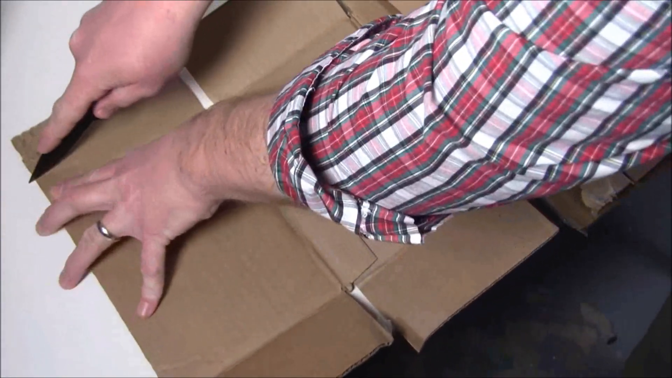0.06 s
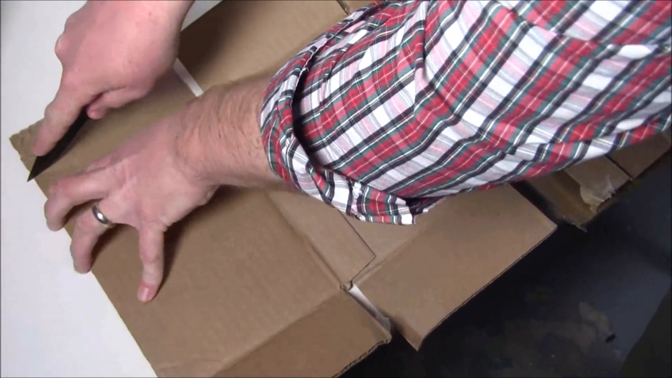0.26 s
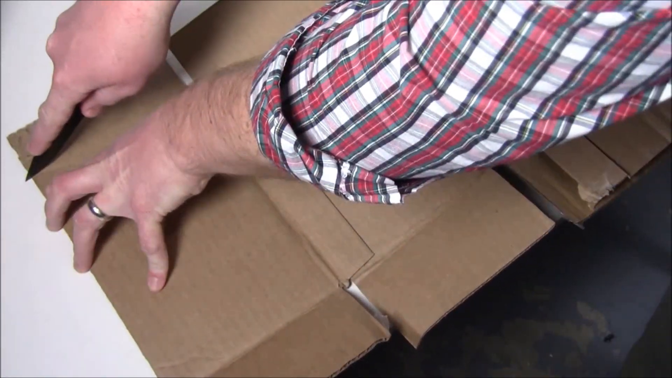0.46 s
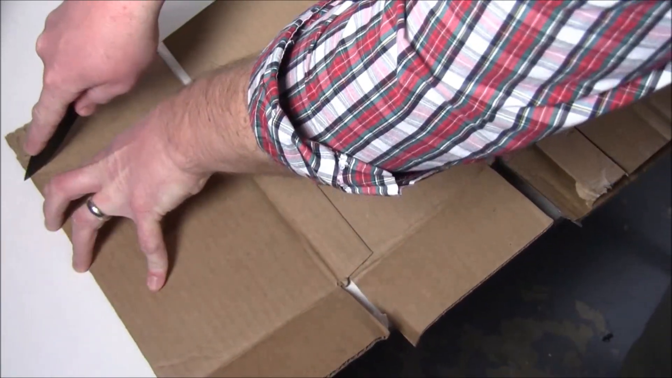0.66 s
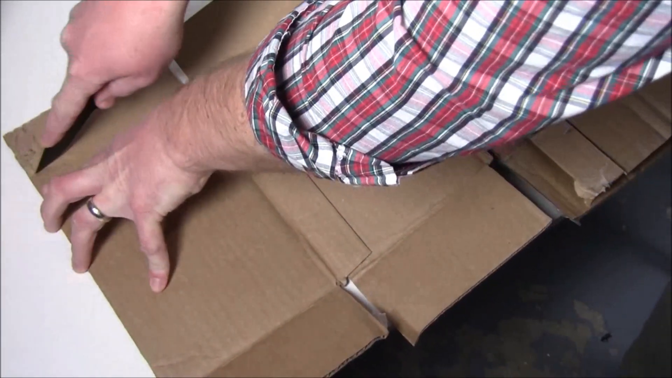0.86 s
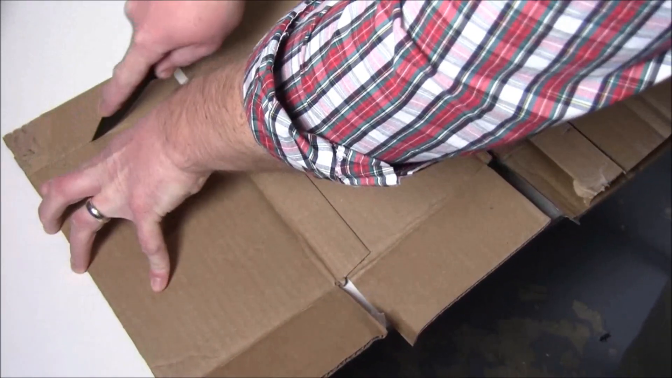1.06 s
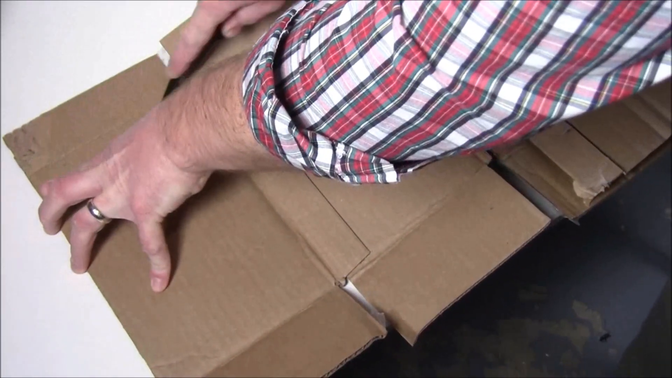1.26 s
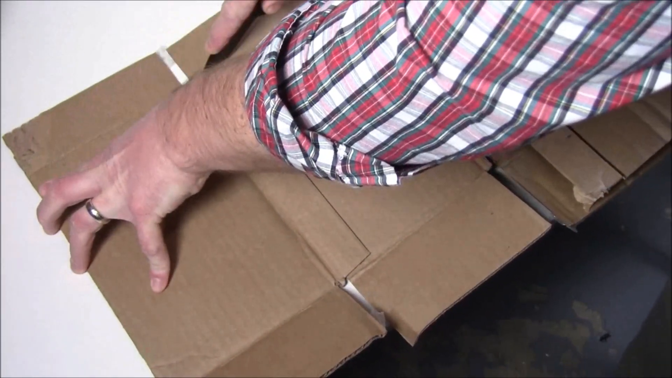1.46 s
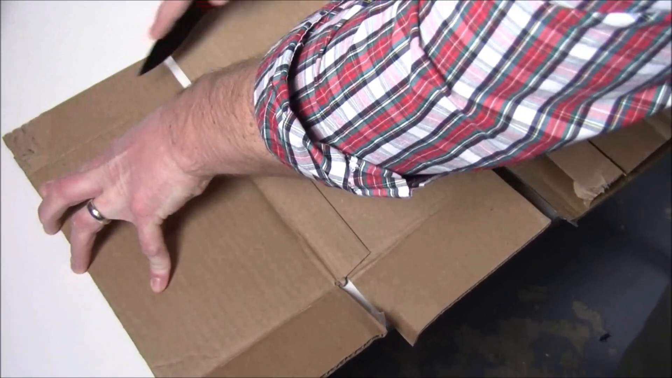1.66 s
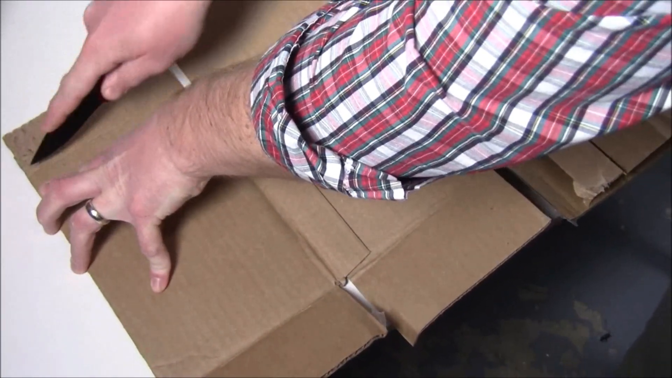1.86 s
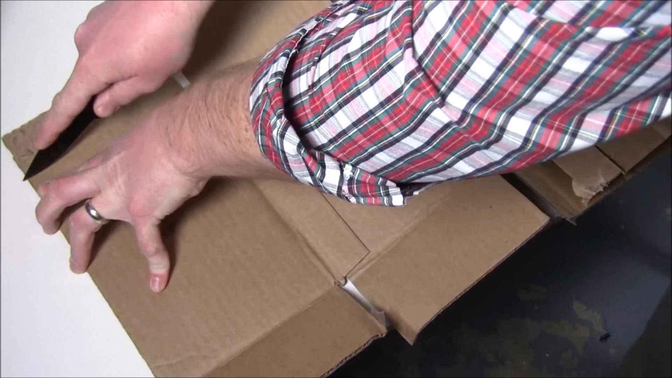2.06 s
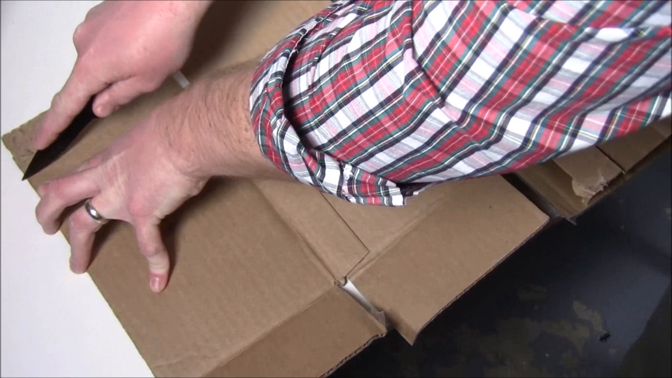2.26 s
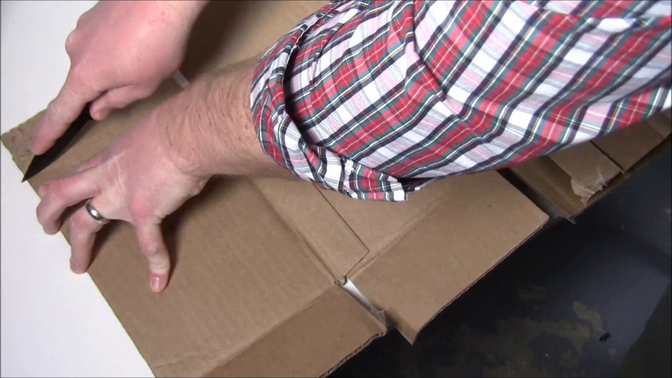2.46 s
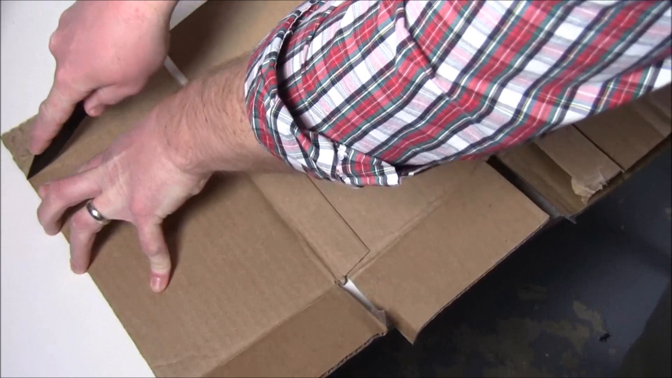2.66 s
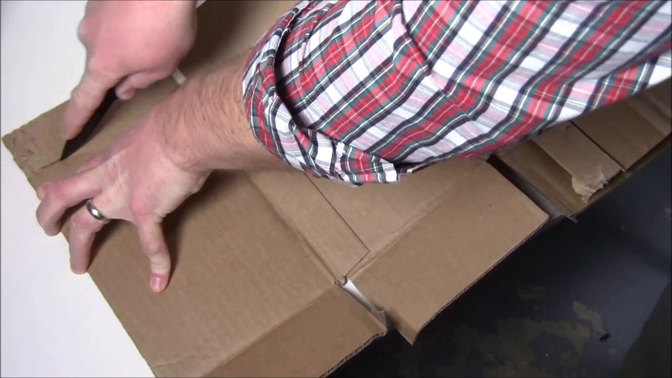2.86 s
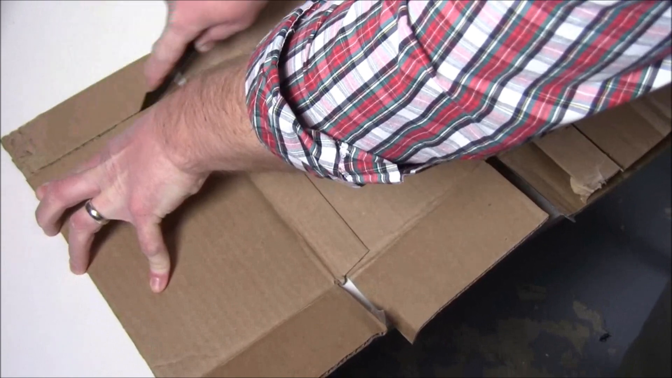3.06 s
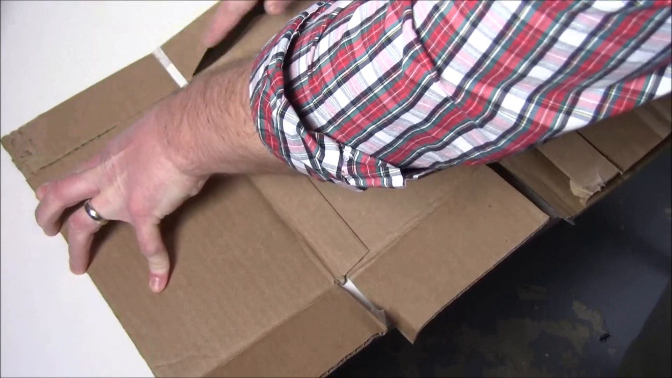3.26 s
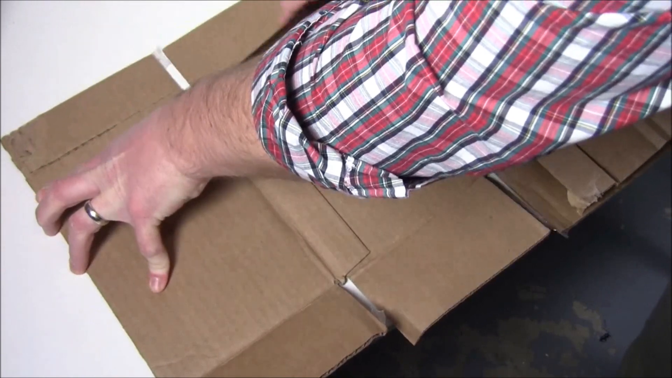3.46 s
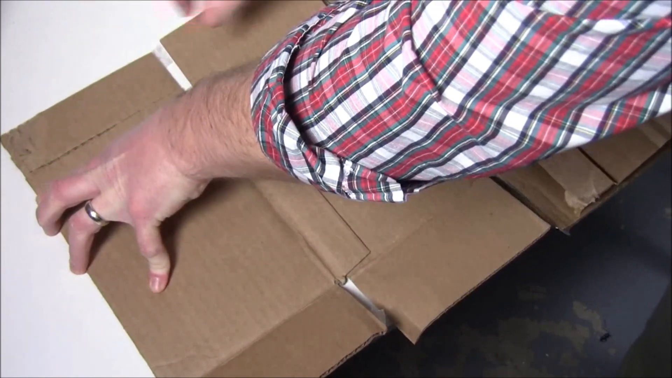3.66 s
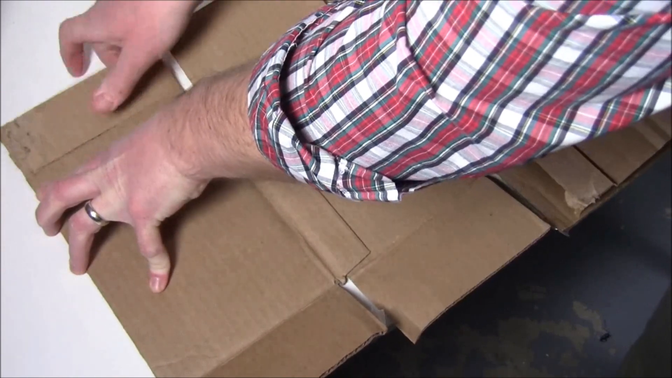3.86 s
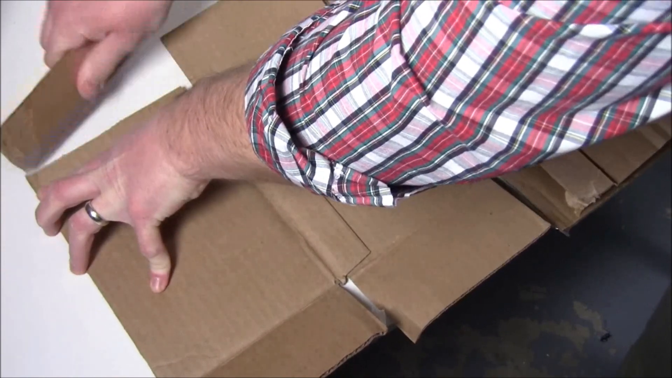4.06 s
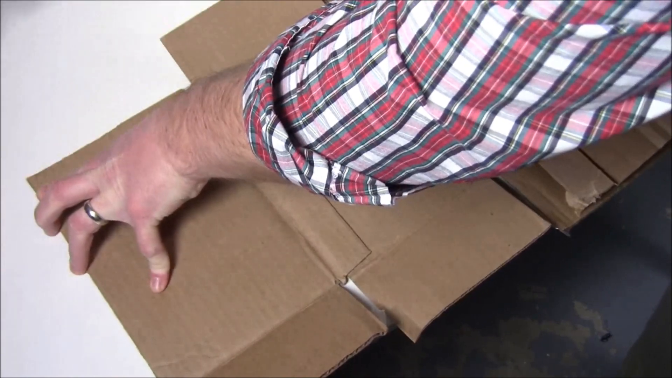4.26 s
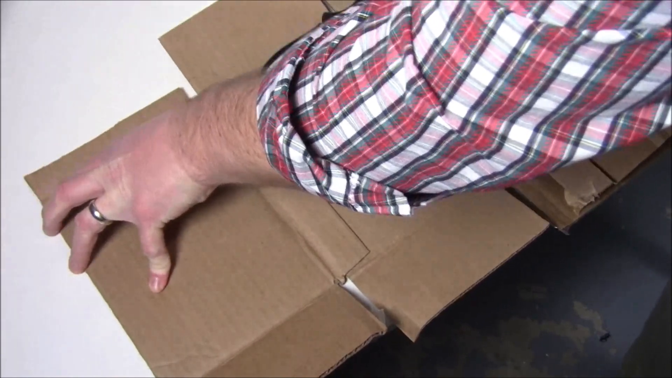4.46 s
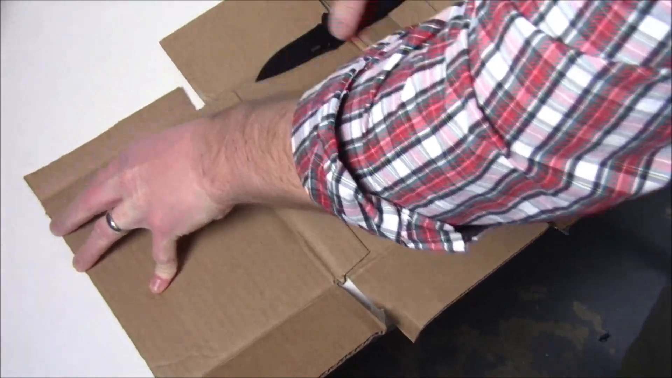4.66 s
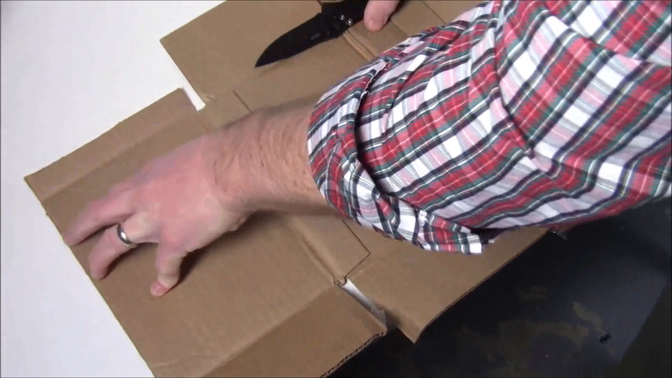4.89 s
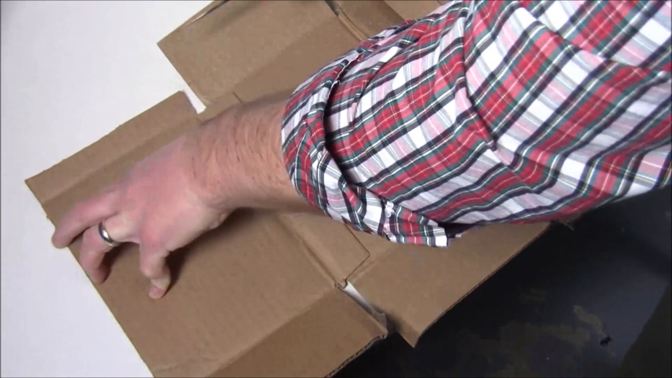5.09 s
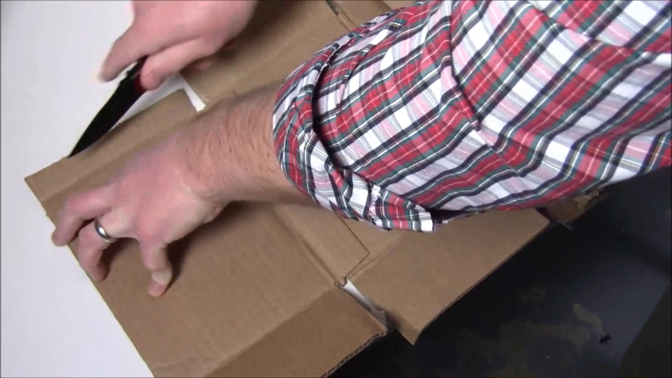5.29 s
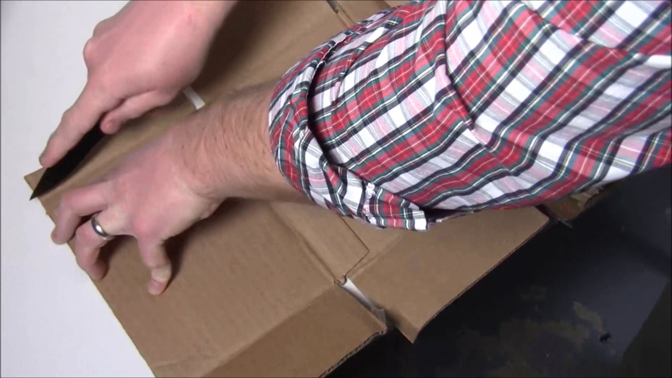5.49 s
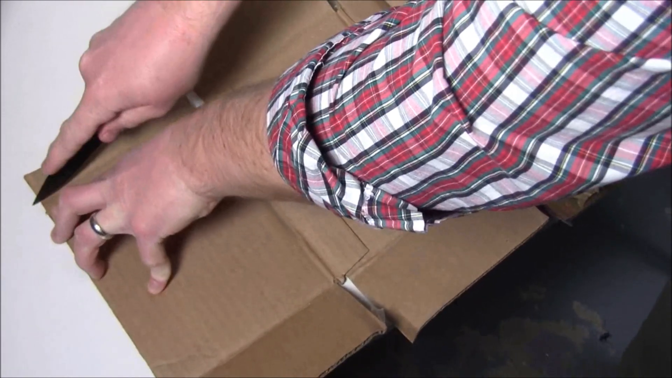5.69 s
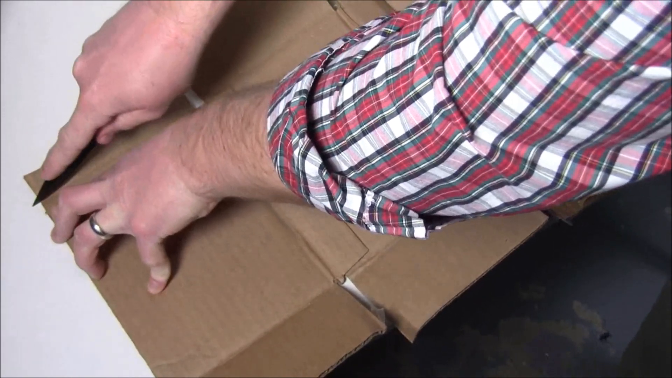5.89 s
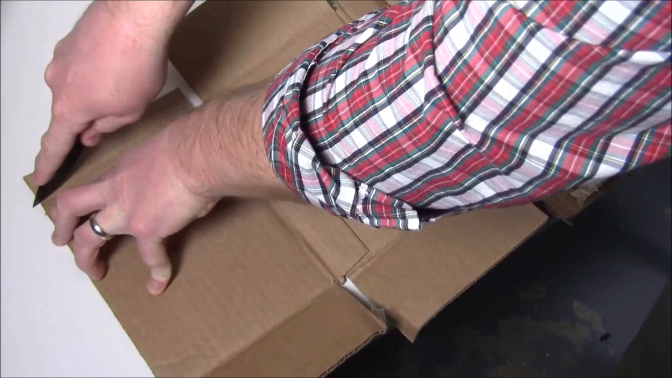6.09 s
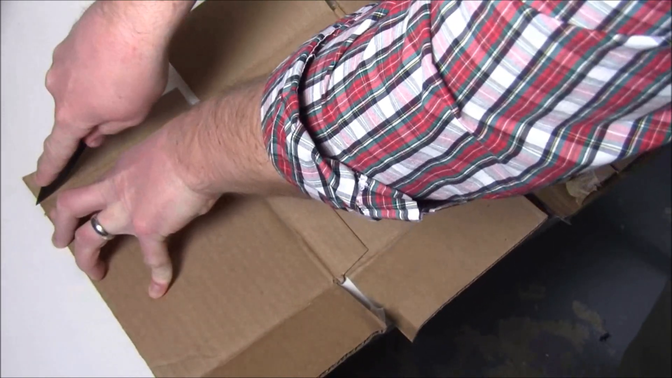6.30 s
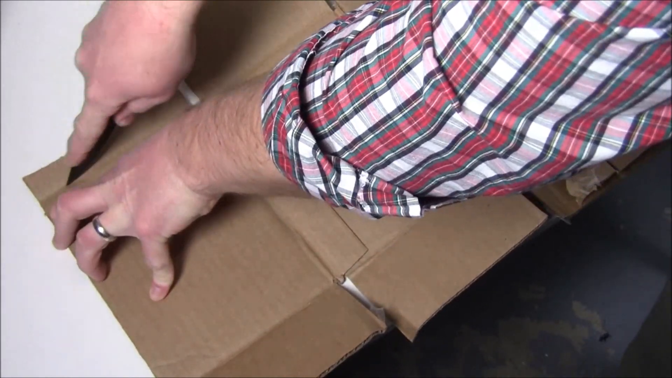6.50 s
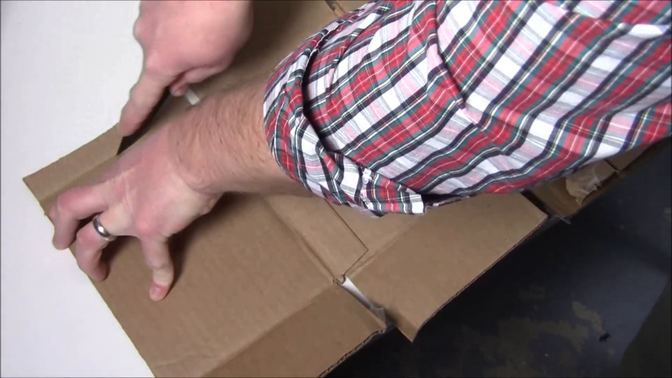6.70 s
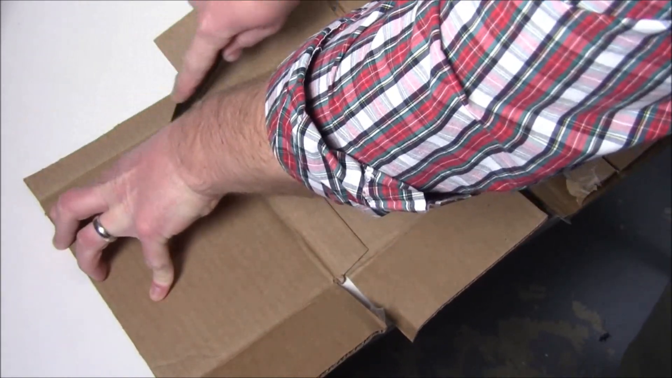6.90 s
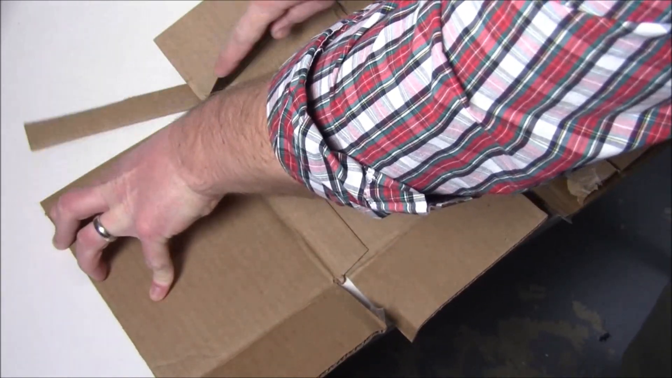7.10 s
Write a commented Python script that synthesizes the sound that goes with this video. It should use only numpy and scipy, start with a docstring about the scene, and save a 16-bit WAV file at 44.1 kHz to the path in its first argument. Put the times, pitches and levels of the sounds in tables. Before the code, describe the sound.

Close, raspy cuts of a blade through cardboard on a table, with crackling fibres, hollow knocks and a short tear in a quiet room.

```python
"""Knife cutting cardboard

Three long strokes slice corrugated board on a table; between them hands shift it and tear off a strip.
Paper fibres snap under the edge, blade and fingers rub the liner, and the hollow board drums along.
The tip squeaks in the second stroke; the third crosses the flutes. Close stereo, small quiet room."""
import sys
import numpy as np
from scipy import signal
from scipy.fft import rfft, irfft
from scipy.io import wavfile

SR = 44100
rng = np.random.default_rng(int(sys.argv[2]) if len(sys.argv) > 2 else 0)


def master(y):
    """Save y as 16-bit WAV."""
    cut = np.clip(np.atleast_2d(y).T, -1, 1)
    pcm = np.round(cut * 32767)  # scale
    wavfile.write(sys.argv[1], SR, pcm.astype(np.int16))


N = 314874

# room tone spectrum: freq_hz, gain_db
AIR_SPECTRUM = [(15, -24.5), (33, 6.5), (54, 9.5), (106, 5), (475, 2.5), (790, -1.5), (3930, -10.5),
                (6900, -16.5), (9270, -15), (13100, -25), (15000, -34)]
# faint rustle of resting hands: time_s, level_db
RESTING_HANDS = [(0.1, -67), (0.65, -78.5), (1.75, -67), (2.1, -80.5), (3.9, -58.5), (4.3, -74),
                 (5.3, -64.5), (5.7, -83), (6.2, -66)]
# hands, blade and loose strip scuffing the sheet: full_at_s, rise_s, hold_s, tear_db, drum_db, rub_db
SCUFFS = [(0.215, 0.041, 0.08, -53, -61, -61.5), (0.428, 0.93, .13, -57, -64, -72.5),
          (1.642, 0.057, 0.031, -51.5, -63, -62.5), (3.476, 0.0092, 0.0046, -40, -42.5, -48.5),
          (3.59, 0.13, 0.14, -45, -50, -61), (3.695, 0.044, 0.074, -39.5, -44, -77),
          (4.002, 0.17, 0.051, -50, -50, -58.5), (4.202, 0.068, 0.0094, -38, -55.5, -43.5),
          (4.346, 0.012, 0.029, -57, -53.5, -46), (4.522, 0.51, 0.2, -55.5, -69, -64),
          (4.85, 0.41, 0.052, -47.5, -53, -57.5), (4.981, 0.26, 0.046, -42.5, -49.5, -57),
          (5.11, 0.15, 0.014, -42.5, -55, -62), (6.358, 0.074, .005, -55, -55.5, -59)]
# knife strokes, one curve each: time_s, tear_db, drum_db, rub_db
KNIFE_STROKES = [
    [(0.905, -71, -79, -70), (0.915, -53.5, -45, -62.5), (1.0, -53.5, -66, -51.5),
     (1.03, -49.5, -41, -42.5), (1.065, -42, -29, -45.5), (1.13, -44, -46.5, -48.5),
     (1.3, -37, -35.5, -46.5), (1.43, -42.5, -38.5, -43.5), (1.51, -27.5, -27, -55), (1.56, -75, -55, -69)],
    [(2.66, -82, -70, -81), (2.76, -55.5, -59.5, -72), (2.92, -53, -60, -61), (2.94, -43.5, -43, -44.5),
     (3.13, -39.5, -33, -46), (3.17, -25, -22.5, -42.5), (3.21, -31, -29, -57.5), (3.26, -23, -31, -48.5),
     (3.3, -34.5, -32.5, -65), (3.37, -54.5, -69, -60.5), (3.465, -56.5, -57.5, -80)],
    [(6.47, -74.5, -78, -79), (6.53, -46, -47, -52), (6.62, -43.5, -40.5, -43), (6.7, -44.5, -34.5, -48),
     (6.79, -44, -39, -46), (6.9, -42.5, -37.5, -47), (7.14, -40.5, -34.5, -44)],
]
# tearing paper spectrum: freq_hz, gain_db
TEAR_SPECTRUM = [(590, -4.5), (1000, 4), (1260, -5.5), (1600, -2), (2080, 0.5), (5260, 1.5), (7000, -9),
                 (9100, -53), (15400, -120)]
# rubbing hiss spectrum: freq_hz, gain_db
RUB_SPECTRUM = [(3530, -18.5), (6000, -35), (6890, -11), (9610, -4.5), (13500, -21.5), (15000, -24.5)]
# modes of the hollow board: pitch_hz, gain_db, t60_s
BOARD_MODES = [(145.6, -8, 0.26), (212, -5.5, 0.072), (297.6, -3, 0.098), (360.3, -4.5, 0.068),
               (410, -4, 0.057), (493, -7, 0.047), (554, -2.5, 0.058), (627, -0.5, 0.061),
               (731, -9.5, 0.049), (850, -10.5, 0.071), (1010, -13, 0.063), (1168, -18, 0.062)]
# snaps, taps, knocks (dB relative within a column): start_s, crack_db, crack_hz, tick_db, thump_db, thump_hz
BLOWS = [(0.0392, -54, 2180, -60.5, -46, 410), (0.2415, -57, 2150, -60, -45.5, 520),
         (0.2661, -28, 1690, -46, -34.5, 610), (0.442, -67, 1500, -83, -51, 450),
         (1.0426, -12, 3400, -26.5, -21.5, 370), (1.487, -24, 3200, -39.5, -30.5, 437),
         (1.4948, -20.5, 2070, -43, -33.5, 300), (1.6947, -40, 1260, -57, -47, 720),
         (2.1193, -58.5, 3400, -63.5, -56.5, 200), (2.2526, -51, 3370, -55.5, -96, 272),
         (2.689, -48.5, 3000, -65, -66, 606), (3.17, -12, 2000, -53, -41, 383),
         (3.2361, -22.5, 2320, -43, -24, 554), (3.3471, -31, 2010, -51, -37.5, 616),
         (3.474, -29.5, 1280, -44.5, -31.5, 1080), (3.6663, -21.5, 2030, -39.5, -19.5, 684),
         (3.713, -32, 2170, -51, -31.5, 670), (3.934, -30.5, 1430, -58, -27.5, 325),
         (3.9852, -28, 4200, -32, -69, 285), (4.0015, -28, 4900, -41, -63, 288),
         (4.0658, -22.5, 4200, -39.5, -47, 365), (4.091, -31.5, 1480, -42.5, -46.5, 358),
         (4.142, -26.5, 5600, -39, -40, 1440), (4.2173, -22.5, 3550, -38, -28, 760),
         (4.544, -41, 2500, -69, -70, 400), (4.595, -44, 2520, -48.5, -45, 383),
         (4.6298, -22.5, 1940, -45.5, -32, 850), (4.668, -44, 3420, -54, -46, 500),
         (4.714, -40, 2620, -51, -47, 337), (4.771, -26.5, 2100, -43, -41.5, 710),
         (4.797, -31.5, 3800, -44, -54, 353), (4.8243, -25.5, 1600, -44, -31, 564),
         (5.147, -44.5, 1970, -56.5, -41.5, 604), (5.758, -49, 4710, -69, -52, 212),
         (5.828, -46, 3270, -57.5, -68, 400), (6.0472, -72, 1380, -84, -47.5, 410),
         (6.6455, -19.5, 3420, -32, -33.5, 530), (7.004, -24.5, 3360, -39, -37, 400),
         (7.0272, -24, 3400, -31.5, -54, 630), (7.12, -24, 2300, -37, -32.5, 630)]
# diffuse stereo side against mid: freq_hz, gain_db
SIDE_SPECTRUM = [(60, -30), (700, -19), (4000, -21), (12000, -5)]

AIR_DB, AIR_SIDE_DB = -66.5, -2
REST_MIX_DB, RELEASE_DB_PER_S = (1.5, -2, -11), (352, 318, 452)   # tear, drum, rub
SCUFF_RISE_DB = 30
MAX_SNAPS_PER_S, SNAP_SPREAD_DB, CLUMP_DB = 8000, 2.8, 1.4
RUB_SIDE_DB, RUMBLE_DB = -16.5, -21   # against rub_db
FLEX_DELAY_S = .0007
CRACK_RISE_S, CRACK_T60_AT_2KHZ_S = 0.00047, 0.039
THUD_T60_S, KNOCK_GAIN, THUD_DB_PER_DB = 0.11, 16, 0.17   # hard blows mostly thud, light taps ring
FLUTES_START_S, FLUTES_PER_S, FLUTE_DROP_DB, ACROSS_BRIGHT_DB = 6.646, 30.3, 8, 7
ROOM_T60_S, ROOM_DB, LEFT_LEAD_SAMPLES = 0.22, -12.5, 0.15
CUTOFF_HZ = 15700
TIME_S = np.arange(N) / SR


def amp(db):
    """dB to gain."""
    return 10 ** (np.asarray(db) / 20)


def unit_rms(x):
    """Scale to rms 1."""
    return x / np.sqrt(np.mean(x ** 2) + 1e-20)


def curves(rows):
    """Breakpoints to one curve per value column."""
    time_s, *columns = np.transpose(rows)
    return [np.interp(TIME_S, time_s, column) for column in columns]


def butter(x, order, hz, kind):
    """Causal Butterworth filter."""
    return signal.sosfilt(signal.butter(order, hz, kind, fs=SR, output="sos"), x)


def colour(x, spectrum, size=4096):
    """Minimum-phase filter from a spectrum table, by cepstral folding."""
    hz, db = np.transpose(spectrum)
    grid_hz = np.arange(size // 2 + 1) * SR / size + 1
    cepstrum = irfft(np.log(amp(np.interp(np.log(grid_hz), np.log(hz), db))))
    cepstrum[1:size // 2] *= 2
    cepstrum[size // 2 + 1:] = 0
    return signal.oaconvolve(x, irfft(np.exp(rfft(cepstrum))))[:len(x)]


def drift(rate_hz, step=32):
    """Slow random curve, rms 1."""
    pole = np.exp(-2 * np.pi * rate_hz * step / SR)
    noise = rng.standard_normal(2 * (N // step) + 2)
    slow = signal.lfilter([1], [1, -2 * pole, pole * pole], noise)[N // step:]
    return np.interp(np.arange(N) / step, np.arange(len(slow)), unit_rms(slow))


def ring(x, hz, t60_s):
    """One mode; a unit click rings at height 1."""
    r, w = amp(-60 / (t60_s * SR)), 2 * np.pi * hz / SR
    return signal.lfilter([0, np.sin(w)], [1, -2 * r * np.cos(w), r * r], x + 1e-18)


def room_tone():
    """Quiet air and hiss, alike left and right in the bass."""
    mid, side = (unit_rms(colour(noise, AIR_SPECTRUM)) for noise in rng.standard_normal((2, N)))
    side = amp(AIR_SIDE_DB) * butter(side, 1, 90, "high")
    return amp(AIR_DB) * np.array([mid + side, mid - side])


def handling_db():
    """Tear, drum and rub levels: resting hands, strokes and scuffs add in power."""
    power = amp(curves(RESTING_HANDS)[0] + np.c_[list(REST_MIX_DB)]) ** 2
    for stroke in KNIFE_STROKES:
        cutting = (TIME_S > stroke[0][0]) & (TIME_S < stroke[-1][0])
        power += amp(curves(stroke)) ** 2 * cutting
    for full_at_s, rise_s, hold_s, *levels_db in SCUFFS:
        span = slice(max(round((full_at_s - 2 * rise_s) * SR), 0), round((full_at_s + hold_s + .5) * SR))
        t = TIME_S[span] - full_at_s
        rise_db = SCUFF_RISE_DB * np.maximum(-t, 0) / rise_s
        release_db = np.outer(RELEASE_DB_PER_S, np.maximum(t - hold_s, 0))
        power[:, span] += amp(np.c_[levels_db] - rise_db - release_db) ** 2
    return 10 * np.log10(power)


def fibre_snaps(tear_db):
    """Fibres break at random: dense under force, sparse under a light hand, a burst per flute wall."""
    snaps_per_s = MAX_SNAPS_PER_S * amp(np.clip(tear_db + 40, -26, 0))
    breaks = rng.random(N) < snaps_per_s / SR
    sizes = amp(SNAP_SPREAD_DB * np.minimum(rng.exponential(1, N), 5)) * rng.choice([-1, 1], N)
    flutes = (TIME_S - FLUTES_START_S) * FLUTES_PER_S
    toughness = rng.uniform(.6, 1.25, N)[np.abs(flutes).astype(int)]
    burst_db = np.where(flutes > 0, toughness * FLUTE_DROP_DB * (2 / 3 - np.sqrt(flutes % 1)), 0)
    grit = unit_rms(breaks * sizes / np.sqrt(snaps_per_s)) + 0.6 * rng.standard_normal(N)
    return unit_rms(grit * amp(CLUMP_DB * drift(70) + burst_db))


def tearing(fibres, tear_db, rub_db, t60_cycles=17.2, bands=16):
    """Each snap rings the bit of liner it frees; brighter with force, fast rubbing and across flutes."""
    band_index = rng.integers(0, bands, N)
    rasp = colour(fibres, TEAR_SPECTRUM)
    tilt_db = ACROSS_BRIGHT_DB * (TIME_S > FLUTES_START_S) + 0.26 * np.clip(tear_db + 29.5, -20, 0)
    out = 0
    for k, hz in enumerate(np.geomspace(1200, 6300, bands)):
        bright_db = 1.38 * (k / bands) ** 2 * (rub_db - tear_db + 5) + tilt_db * k / bands
        band = butter(rasp, 1, [hz / 1.0676, hz * 0.99], "band")
        ringing = unit_rms(ring(rasp * (band_index == k), hz, t60_cycles / hz)) * np.std(band)
        wander_db = 3.03 * drift(3.1)   # resonances come and go along the cut
        out += amp(bright_db + wander_db) * (band + 1.455 * ringing) * (-1) ** k
    return amp(tear_db - 2) * out / np.std(rasp)


def rubbing(fibres, rub_db):
    """Steel and skin on paper: hiss roughened by snaps, widest at the top. Returns mid, side."""
    friction = rng.standard_normal(N) * amp(1.4 * drift(25)) + 1.1 * fibres
    mid = unit_rms(colour(friction, RUB_SPECTRUM))
    hiss = unit_rms(colour(rng.standard_normal(N), RUB_SPECTRUM))
    side = amp(RUB_SIDE_DB) * signal.lfilter([1, -2, 1], 1, hiss)
    return amp(rub_db) * mid, amp(rub_db) * side


def board(fibres, drum_db):
    """Blows plus the hollow board's modes, driven by steady handling and by thumps near their pitch."""
    start_s, _, _, _, thump_db, thump_hz = np.transpose(BLOWS)
    hits = np.round(start_s * SR).astype(int)
    scatter_db = rng.normal(0, 2.2, (len(BLOWS), len(BOARD_MODES)))
    power_gain = sum(amp(2 * db) * t60_s * SR / (12 * np.log(10)) for _, db, t60_s in BOARD_MODES)
    drive = amp(drum_db) * unit_rms(fibres + 0.45 * rng.standard_normal(N)) / np.sqrt(power_gain)
    drive = butter(drive, 3, 260, "high")   # edge too light for the lowest modes
    out = blows()
    for k, (hz, gain_db, t60_s) in enumerate(BOARD_MODES):
        force = drive * amp(3 * drift(6))   # contact point wanders
        octaves_off = np.abs(np.log2(hz / thump_hz))
        force[hits] += amp(thump_db + scatter_db[:, k] - 4.4 * octaves_off) * (-1) ** k
        flexed = np.arange(N) + FLEX_DELAY_S * SR * drift(4)   # sheet flexes, pitch wavers
        out += amp(gain_db) * np.interp(flexed, np.arange(N), ring(force, hz, t60_s))
    return butter(out, 4, 150, "high")   # a thin sheet radiates no deep bass


def table_rumble(rub_db):
    """The table under the board rumbles with the rubbing."""
    return amp(RUMBLE_DB + rub_db) * unit_rms(butter(rng.standard_normal(N), 2, [55, 110], "band"))


def blows(size=8192):
    """Snaps, taps and knocks: a click and dying noise give a pitched crack, bright tick and dry thud."""
    out, t = np.zeros(N + size), np.arange(size) / SR
    click = t == 0
    for start_s, crack_db, crack_hz, tick_db, thump_db, thump_hz in BLOWS:
        noise = rng.standard_normal(size)
        decay = amp(-60 * t / CRACK_T60_AT_2KHZ_S * np.sqrt(crack_hz / 2000))
        burst = noise * decay * np.minimum(t / CRACK_RISE_S, 1) + 4 * click
        rasp = colour(burst, TEAR_SPECTRUM)
        tone = ring(np.diff(rasp, prepend=0), crack_hz, t60_s=4 / crack_hz)
        crack = tone / np.abs(tone).max() + .5 * rasp / np.abs(rasp).max()
        crack = amp(crack_db - 0.5) * butter(crack, 4, 2 * crack_hz, "low")
        tick = amp(tick_db + 15.5) * colour(burst, RUB_SPECTRUM)
        thud = noise * amp(-60 * t / THUD_T60_S) + KNOCK_GAIN * click
        for _ in range(2):
            thud = butter(thud, 1, [thump_hz / 1.45, thump_hz * 1.41], "band")
        thud_db = thump_db + 6.5 + THUD_DB_PER_DB * (thump_db + 24.5)
        start = round(start_s * SR)
        out[start:start + size] += crack + tick + amp(thud_db) * thud / np.abs(thud).max()
    return out[:N]


def tip_squeak(fibres, start_s=2.78, end_s=2.94, pitch_hz=1680, level_db=-63):
    """The tip starts to slide: a narrow resonance swells and fades."""
    progress = np.clip((TIME_S - start_s) / (end_s - start_s), 0, 1)
    swell = np.sin(np.pi * progress) ** .5
    return amp(level_db) * swell * unit_rms(ring(fibres, pitch_hz, t60_s=.012))


def room(x):
    """Walls return a short dull tail; left and right agree in the bass and part in the treble."""
    t = np.arange(round(.4 * SR)) / SR
    tails = rng.standard_normal((2, len(t))) * amp(-60 * t / ROOM_T60_S)
    walls = signal.lfilter([.4], [1, -.6], tails[0] * (t > .004))
    mid = x + amp(ROOM_DB) * signal.oaconvolve(x, walls / np.linalg.norm(walls))[:N]
    early = tails[1] * amp(-300 * t)
    diffuse = signal.oaconvolve(x, early / np.linalg.norm(early))[:N]
    side = colour(diffuse, SIDE_SPECTRUM) + LEFT_LEAD_SAMPLES * np.gradient(mid)
    return np.array([mid + side, mid - side])


def scene():
    """One stream of fibre snaps drives hiss, tearing, squeak and board; the room surrounds them."""
    tear_db, drum_db, rub_db = handling_db()
    fibres = fibre_snaps(tear_db)
    hiss, hiss_side = rubbing(fibres, rub_db)
    liner = hiss + tearing(fibres, tear_db, rub_db) + tip_squeak(fibres)
    body = board(fibres, drum_db) + table_rumble(rub_db)
    return room(liner + body) + np.array([hiss_side, -hiss_side]) + room_tone()


def record(dry):
    """Steep low-pass."""
    return signal.sosfilt(signal.cheby2(12, 70, CUTOFF_HZ, fs=SR, output="sos"), dry)


dry = scene()
out = record(dry)
master(out)
```